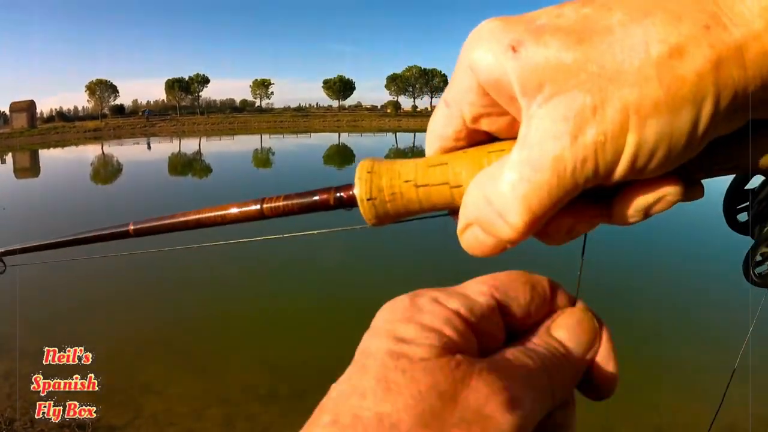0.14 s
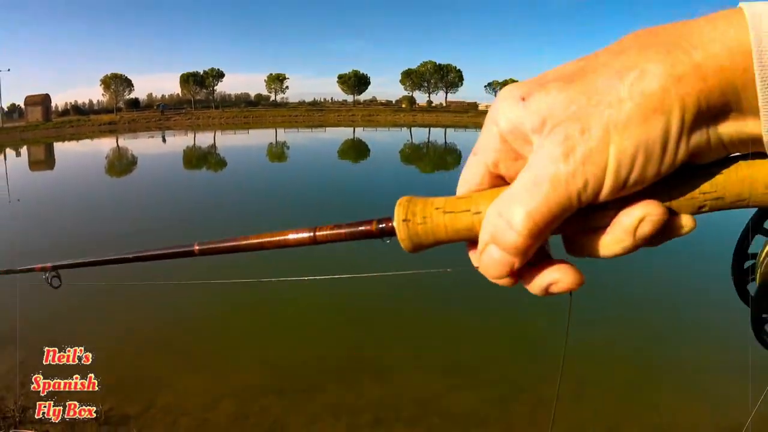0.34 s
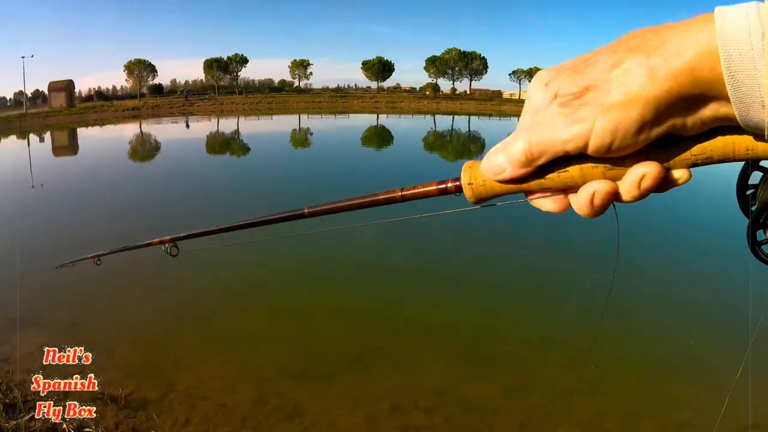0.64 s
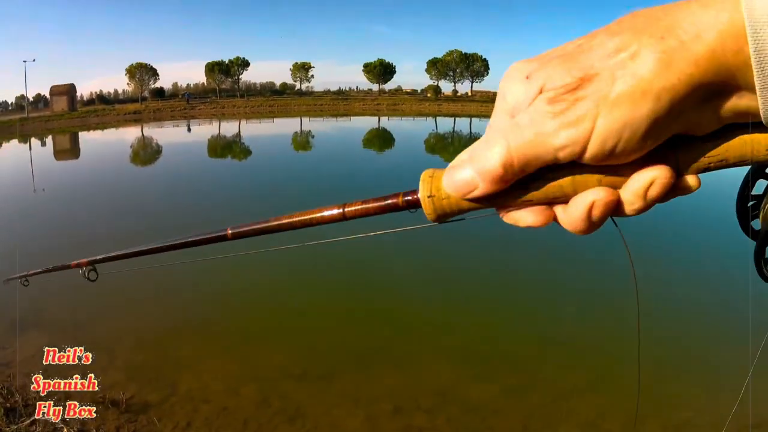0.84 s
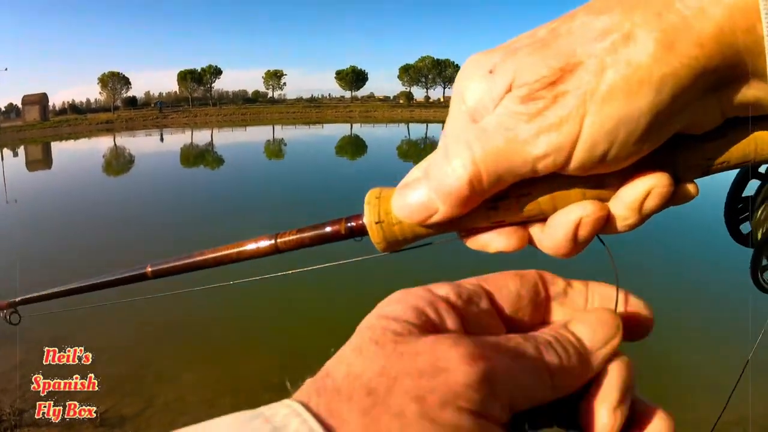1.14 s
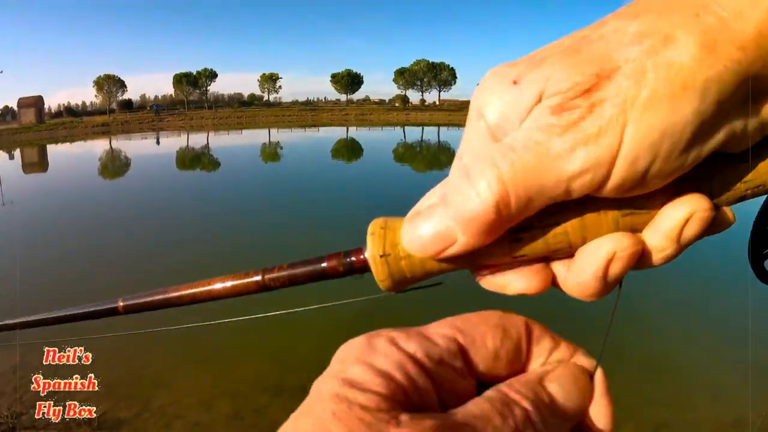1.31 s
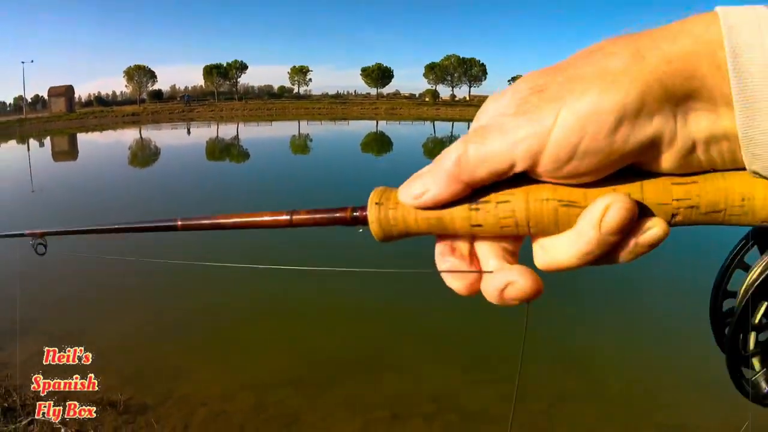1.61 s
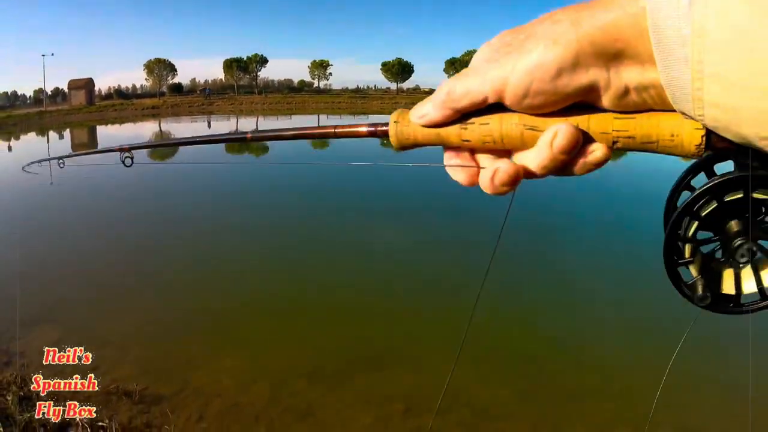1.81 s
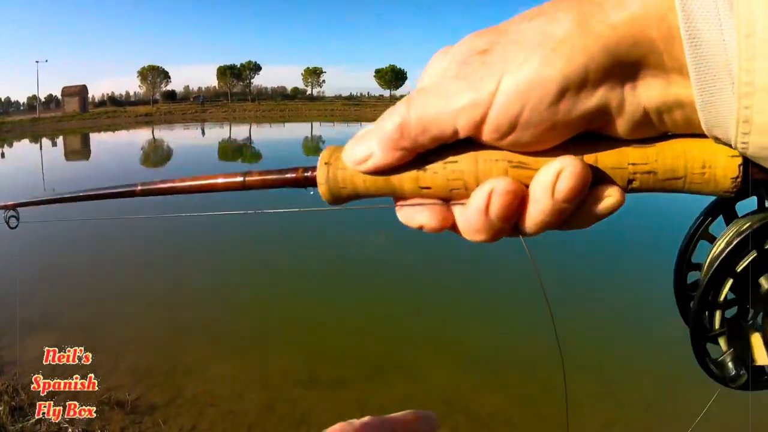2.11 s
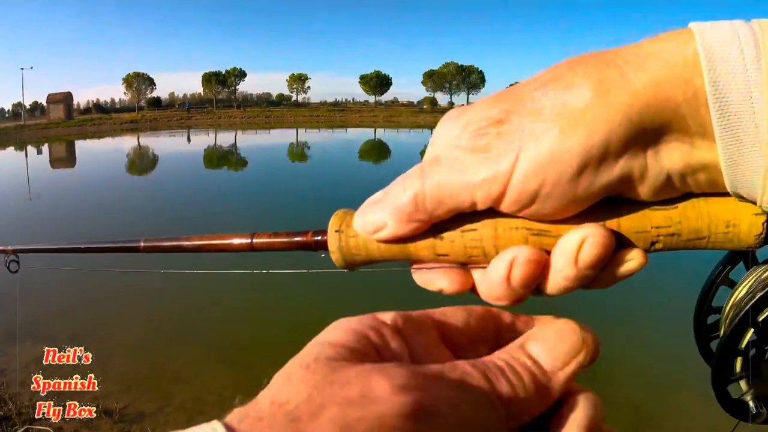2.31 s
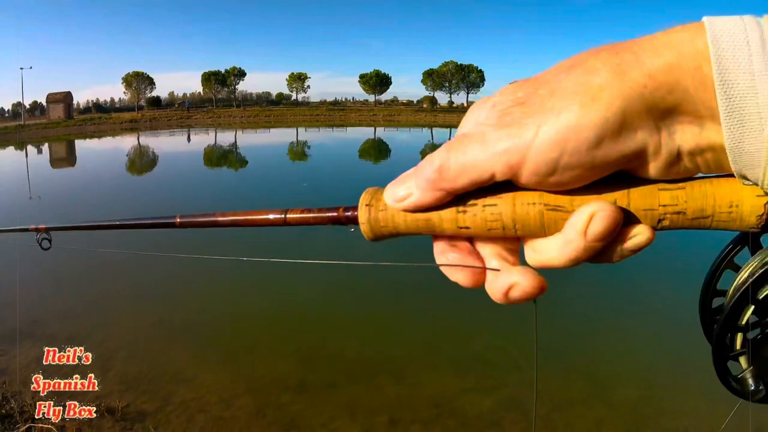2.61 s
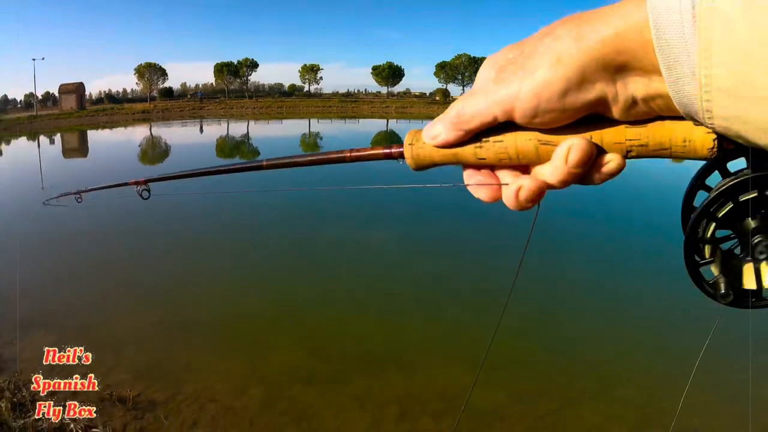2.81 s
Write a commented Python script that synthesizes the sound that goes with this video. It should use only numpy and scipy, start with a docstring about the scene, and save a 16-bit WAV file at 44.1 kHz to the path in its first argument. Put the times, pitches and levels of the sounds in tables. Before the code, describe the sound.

Fly fishing line stripped in three quick, hissing, whistling pulls, with sharp clicks and knocks between

```python
"""Fly line stripped in three pulls, close to a small camera microphone on a calm lake bank.
Close: dense tiny slips hiss through finger and guides, with a whistle that follows line speed.
Also close: slack line brushes skin, rod and reel ring from knocks, and the camera takes low jolts.
Far: noise shaped into rumble and air, a band-filtered engine that drops to a fainter level, and a
narrow-band insect buzz."""
import sys
import numpy as np
from scipy import signal
from scipy.io import wavfile
from scipy.ndimage import uniform_filter1d

SR = 44100
rng = np.random.default_rng(int(sys.argv[2]) if len(sys.argv) > 2 else 0)


def inscribe(sig):
    """Save sig as 16-bit PCM at rate SR to the path in sys.argv[1].

    A 1-D sig is mono; a 2-D sig holds one channel per row.
    Samples are clipped to [-1, 1] before scaling.
    """
    pcm = np.round(np.clip(np.atleast_2d(sig).T, -1, 1) * 32767)
    wavfile.write(sys.argv[1], SR, pcm.astype(np.int16))


N = 130095  # samples

# Far: spectrum of the open air, relative. Columns: pitch_hz, density_db
AIR_SPECTRUM = [(12, -30), (20, 0), (22, 14.5), (49, -7), (134, -12.5), (270, -19), (399, -20.5),
                (1400, -35.5), (2600, -37.5), (4810, -37.5), (7950, -42.5), (14300, -46), (16000, -39.5)]
AIR_LEVEL_DB, AIR_PATCH_DB = -44.5, 1.9  # overall rms; rms depth of the drifting patches
# Far: level of the engine over time. Columns: time_s, level_db
ENGINE_LEVEL = [(0, -49.5), (.2, -49.5), (.45, -49.5), (.6, -58.5), (.9, -54), (1.1, -55.5)]
# Far: resonances that colour the engine. Columns: pitch_hz, width_hz, level_db
ENGINE_BODY = [(350, 294, -5.5), (603.4, 718, -3.5), (1310.8, 153, -8)]
# Bands of the insect buzz. Columns: pitch_hz, width_hz, level_db
INSECT_BANDS = [(4800, 360, -66.5), (9566, 236, -74), (14110, 500, -70), (11540, 9.9, -83.5)]

# Close: modes of rod and reel ringing freely, relative. Columns: pitch_hz, level_db, t60_s
ROD_MODES = [(175, -7.5, 0.187), (298.25, 2, 0.1467), (419.8, 3, 0.0539), (527.1, 1.5, 0.0885),
             (637, 2.5, 0.061), (714.9, 7, 0.0387), (959.7, 2.5, 0.036), (1241.4, -0.5, 0.0334),
             (1441, 4, 0.0292), (1650, -1.5, 0.0325), (1817, -5, 0.042), (2512, -4.5, 0.0172),
             (3090, -13.5, 0.0256), (3900, 0, 0.0074), (5000, -3, 0.016), (7000, -9, 0.0246)]
# Close: knocks on rod and reel. Columns: start_s, level_db, colour_hz, breadth_octaves, chatter_s,
# ring_time_factor (the grip's effect on t60), crack_db (against the blow)
KNOCKS = [(0.061, -60.5, 2000, 1.33, 0.00082, 0.23, -3), (0.0984, -42, 1410, 0.53, 0.00113, 0.58, -1.5),
          (0.4925, -30, 1800, 0.925, 0.00048, 0.56, -1), (0.5223, -28, 733, 0.85, 0.00146, 0.55, -2.5),
          (0.5239, -42, 1650, 0.41, 0.0017, 0.44, 3), (0.7969, -39, 2000, 1.53, 0.00072, 0.51, 3.5),
          (0.9441, -31.5, 5310, 0.75, 0.00094, 0.275, 6.5), (1.2407, -61, 2000, 0.76, 0.00097, 0.37, 1),
          (1.761, -31, 350, 1.05, 0.0045, 0.424, -4), (1.766, -40.5, 1680, 1.2, 0.0064, 0.24, -0.5),
          (2.0395, -12.5, 2390, 1.65, 0.00141, .8, -0.5), (2.0422, -7, 977, 1.195, 0.00192, 1.42, -6),
          (2.0428, -23.5, 4500, 0.424, 0.0018, 1.6, -3), (2.06, -27.5, 592, 1.27, 0.0102, .6, 0),
          (2.057, -31, 3970, 1.05, 0.0105, 0.37, -7.5), (2.3698, -46.5, 2000, 0.71, 0.00096, 0.27, 4.5),
          (2.391, -35.5, 5800, 1.33, 0.00082, 0.27, 4), (2.661, -20.5, 319, 1.014, 0.00197, 0.32, -12),
          (2.68, -28, 1330, 1.83, 0.00694, 0.48, 2.5), (2.692, -18.5, 3240, 1.55, 0.00166, 0.314, 0),
          (2.706, -18.5, 298, 0.443, 0.0026, 0.396, 2), (2.795, -40.5, 497, 2.1, 0.0082, 0.27, -3),
          (2.8716, -47, 3000, 1.5, 0.00096, .3, 0.5)]
CHATTER_SHARE, SNAP_DB = 0.506, -32.5  # chatter norm against the blow; unfiltered edge of the crack

# Close: one list of points per pull of line.
# Columns: time_s, friction_db, whistle_hz (from line speed), whistle_db (before the guides add to it)
PULLS = [
    [(.09, -69.5, 3500, -69), (.12, -59, 3580, -80), (.18, -51, 3600, -75), (.2, -66, 3610, -79.5),
     (.24, -46.5, 3640, -69), (.3, -43, 3800, -56), (.325, -45, 4200, -58), (.36, -47, 5030, -53),
     (.395, -47, 5860, -52), (.415, -45.5, 6690, -62.5), (.46, -47, 5000, -55.5), (.52, -42.5, 3800, -71.5),
     (.55, -59.5, 3500, -81.5)],
    [(1.38, -69, 3500, -98), (1.42, -52, 3525, -67.5), (1.49, -49, 3470, -56.5), (1.51, -44, 3520, -61.5),
     (1.565, -46.5, 3763, -40), (1.605, -45.5, 3900, -40), (1.63, -44.5, 4800, -56.5),
     (1.66, -46, 6550, -63.5), (1.69, -46.5, 7000, -66.5), (1.72, -48, 5780, -62.5),
     (1.745, -43, 4800, -43), (1.77, -44, 3610, -42.5), (1.785, -58, 3480, -78.5),
     (1.82, -52.5, 3500, -82.5), (1.89, -57, 3520, -86.5), (1.91, -79.5, 3500, -82)],
    [(2.4, -61, 3530, -88.5), (2.44, -53, 3420, -77), (2.5, -48.5, 3540, -76.5), (2.55, -47.5, 3455, -50.5),
     (2.575, -43.5, 3800, -51), (2.605, -45, 5000, -48), (2.65, -43, 5914, -64.5), (2.7, -40.5, 5470, -72),
     (2.76, -47, 4372, -45), (2.81, -48, 3720, -63.5), (2.82, -79.5, 3520, -82.5)],
]
# Close: resonances of the rod guides, relative. Columns: pitch_hz, width_hz, level_db
GUIDES = [(542, 180, -4.5), (2000, 2720, -6.5), (3461, 423, -5.5), (3800, 160, -3), (4200, 454, 1.5),
          (4500, 1830, 0.5), (4896, 382, -1), (5460, 516, -8.5), (6992, 2520, -7), (9860, 2300, -13.5),
          (14960, 1300, -17)]
RUB_GRAINS_PER_S, RUB_SPREAD_DB = 7000, 2.5  # slips per second; scale of their uneven sizes
GUIDE_FLICKER_DB, WHISTLE_FLICKER_DB = 2.5, 3.5  # rms; contact keeps changing
WHISTLE_WIDTH_HZ, WHISTLE_WOBBLE, WHISTLE_DIRECT_DB = 154, 0.0237, -1  # wobble: rms share of pitch
# the treble swells with line speed: its level is given at a 5000 Hz whistle
TREBLE_HZ, TREBLE_WIDTH_HZ, TREBLE_DB, TREBLE_DB_PER_OCTAVE = 12400, 10900, -17, 16

# At the microphone: jolts of the camera when the line comes tight.
# Columns: start_s, level_db (before doubling), pitch_hz, t60_s
JOLTS = [(0.526, -34, 60, 0.071), (1.764, -32, 44.3, 0.2), (2.046, -37.5, 135.7, 0.149),
         (2.692, -25.5, 43.1, 0.086), (2.707, -33.5, 151.8, 0.092)]
# Close: light brushes of slack line on skin. Columns: start_s, length_s, level_db, centre_hz
BRUSHES = [(.6, 0.087, -59, 5000), (0.858, 0.159, -55.5, 5600), (1.227, 0.107, -62.5, 6500),
           (2.084, 0.12, -58, 5750), (0.563, 0.089, -57.5, 2000), (1.82, 0.0546, -55.5, 1500)]

OFFSET, EDGE_HZ = -.0147, 15780  # steady offset, full scale 1; upper band limit


def amp(db):
    """Decibels to amplitude."""
    return 10 ** (np.asarray(db) / 20)


def evened(x):
    """Scale to rms 1."""
    return x / np.sqrt(np.mean(x ** 2) + 1e-20)


def add(mix, start_s, sound):
    """Lay a sound into the mix, cut at the end."""
    part = mix[round(start_s * SR):][:len(sound)]
    part += sound[:len(part)]


def resonate(x, hz, width_hz):
    """Resonance of gain 1 that follows hz: shift down to zero, smooth, shift back."""
    turn = np.exp(2j * np.pi * np.cumsum(hz * np.ones(len(x))) / SR)
    decay = np.exp(-np.pi * width_hz / SR)
    return 2 * (turn * signal.lfilter([1 - decay], [1, -decay], x / turn)).real


def resonate_twice(x, hz, width_hz):
    """Two equal resonances in a row, for steeper sides."""
    return resonate(resonate(x, hz, width_hz), hz, width_hz)


def band(x, hz, width_hz):
    """Steep band at rms 1."""
    return evened(resonate_twice(x, hz, width_hz))


def wander(n, size):
    """Smooth chance at rms 1, averaged twice over size samples."""
    return evened(uniform_filter1d(uniform_filter1d(rng.standard_normal(n), size), size))


def rub(n):
    """Friction as dense tiny slips of uneven size and random sign, at rms 1."""
    draw = rng.random((n, 3))
    size_db = RUB_SPREAD_DB * np.minimum(-np.log(1 - draw[:, 0]), 3.5)
    size = amp(size_db) * np.sign(draw[:, 1] - .5)
    return evened(size * (draw[:, 2] < RUB_GRAINS_PER_S / SR))


def air():
    """Open-air rumble and hiss: noise shaped in frequency, with patches that drift in level."""
    frames, hz = N // 256 + 5, np.fft.rfftfreq(1024, 1 / SR)
    real, imaginary, patches = rng.standard_normal((frames, 513, 3)).T
    patches = uniform_filter1d(patches, size=40, axis=0)  # across frequency
    patches = evened(uniform_filter1d(patches, size=6, axis=1))  # across time
    pitch_hz, density_db = np.transpose(AIR_SPECTRUM)
    shape_db = np.interp(np.log(hz + 1), np.log(pitch_hz), density_db)[:, None]
    spectrum = (real + 1j * imaginary) * amp(shape_db + AIR_PATCH_DB * patches)
    spectrum = spectrum * (hz > 10)[:, None]
    return amp(AIR_LEVEL_DB) * evened(signal.istft(spectrum, nperseg=1024, noverlap=768)[1][:N])


def far_engine():
    """One noise through the body's resonances, dropping to a fainter level."""
    time_s, level_db = np.transpose(ENGINE_LEVEL)
    noise = rng.standard_normal(N)
    body = sum(amp(db) * band(noise, hz, width) for hz, width, db in ENGINE_BODY)
    return body * amp(np.interp(np.arange(N) / SR, time_s, level_db))


def insect_buzz():
    """Steady noise in separate bands."""
    return sum(amp(db) * band(rng.standard_normal(N), hz, width) for hz, width, db in INSECT_BANDS)


def knock(start_s, level_db, colour_hz, octaves, chatter_s, ring_time_factor, crack_db):
    """A blow and its short chatter crack drily and ring the modes near its colour."""
    t = np.arange(5000) / SR
    ring = np.zeros(len(t))
    for k, (hz, db, t60_s) in enumerate(ROD_MODES):
        off_colour_db = 4.14 * (np.log2(hz / colour_hz) / octaves) ** 2
        decay_db = 60 * t / (t60_s * ring_time_factor)
        ring += (-1) ** k * amp(db - decay_db - off_colour_db) * np.sin(2 * np.pi * hz * t)

    draw, u = rng.standard_normal((2, 5000)), t / chatter_s
    hits = draw[0] * (abs(draw[1]) > 1.1)
    chatter = hits * (u + 0.264) * np.exp(-u)
    crack = band(chatter, colour_hz, colour_hz * octaves) + amp(SNAP_DB) * evened(chatter)
    drive = CHATTER_SHARE * chatter / np.linalg.norm(chatter) + (t == 0)  # the blow is one sample
    rung = signal.fftconvolve(drive, ring / abs(ring).max())[:5000]
    return start_s, amp(level_db) * (rung + amp(crack_db) * crack / abs(crack).max())


def pull(rows):
    """Slips ring the guides in shifting shares; the line's surface texture whistles higher as it
    runs faster, louder where it crosses a guide resonance."""
    time_s, friction_db, whistle_hz, whistle_db = np.transpose(rows)
    t = np.arange(time_s[0], time_s[-1], 1 / SR)
    n = len(t)
    slips, speed_hz = rub(n), np.interp(t, time_s, whistle_hz)

    hiss = np.zeros(n)
    for k, (hz, width, db) in enumerate(GUIDES):
        share_db = db + GUIDE_FLICKER_DB * wander(n, size=700)
        hiss += (-1) ** k * amp(share_db) * band(slips, hz, width)
    treble_db = TREBLE_DB + TREBLE_DB_PER_OCTAVE * np.log2(speed_hz / 5000)
    hiss = evened(hiss) + amp(treble_db) * band(rub(n), TREBLE_HZ, TREBLE_WIDTH_HZ)

    pitch_hz = speed_hz * (1 + WHISTLE_WOBBLE * wander(n, size=300))
    source = band(rub(n), pitch_hz, WHISTLE_WIDTH_HZ) * amp(WHISTLE_FLICKER_DB * wander(n, size=350))
    whistle = amp(WHISTLE_DIRECT_DB) * source
    for k, (hz, width, db) in enumerate(GUIDES):
        whistle += (-1) ** k * amp(db) * resonate_twice(source, hz, width)

    hiss = amp(np.interp(t, time_s, friction_db)) * hiss
    return time_s[0], hiss + amp(np.interp(t, time_s, whistle_db)) * whistle


def jolt(start_s, level_db, hz, t60_s):
    """A low push that swings back and dies away, as a decaying sine."""
    t = np.arange(6000) / SR
    return start_s, amp(level_db - 60 * t / t60_s) * np.sin(2 * np.pi * hz * t) * 2


def brush(start_s, length_s, level_db, hz):
    """A short soft swish: friction in one broad band that swells and fades."""
    n = round(length_s * SR)
    return start_s, amp(level_db) * np.sqrt(np.hanning(n)) * band(rub(n), hz, 0.59 * hz)


def scene():
    """The far background, then the close events laid over it, in one channel."""
    mix = air() + far_engine() + insect_buzz()
    for row in KNOCKS:
        add(mix, *knock(*row))
    for rows in PULLS:
        add(mix, *pull(rows))
    for row in JOLTS:
        add(mix, *jolt(*row))
    for row in BRUSHES:
        add(mix, *brush(*row))
    return mix[None]


def record(dry):
    """The band limit, then a small steady offset."""
    lowpass = signal.firwin(1023, EDGE_HZ, window=("kaiser", 9), fs=SR)
    return OFFSET + signal.oaconvolve(dry, lowpass[None], "same")


dry = scene()
out = record(dry)
inscribe(out)
```